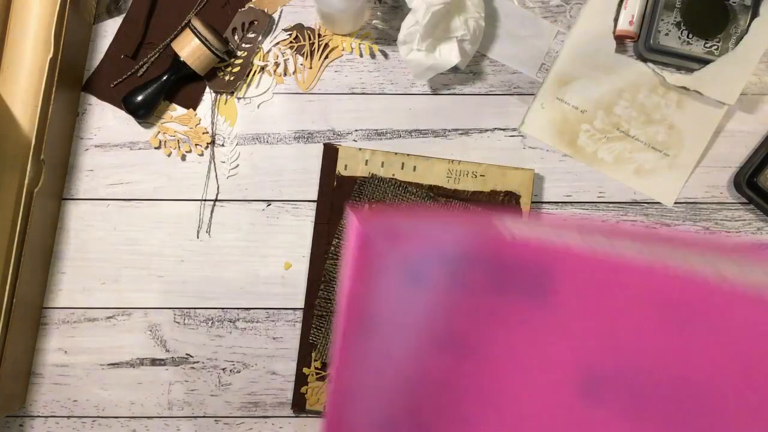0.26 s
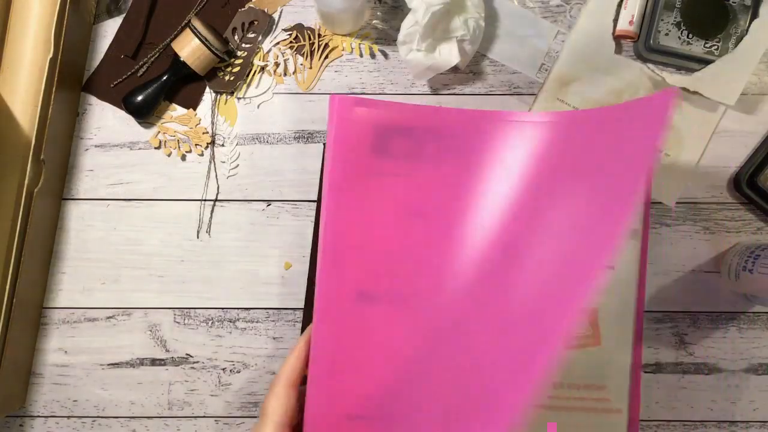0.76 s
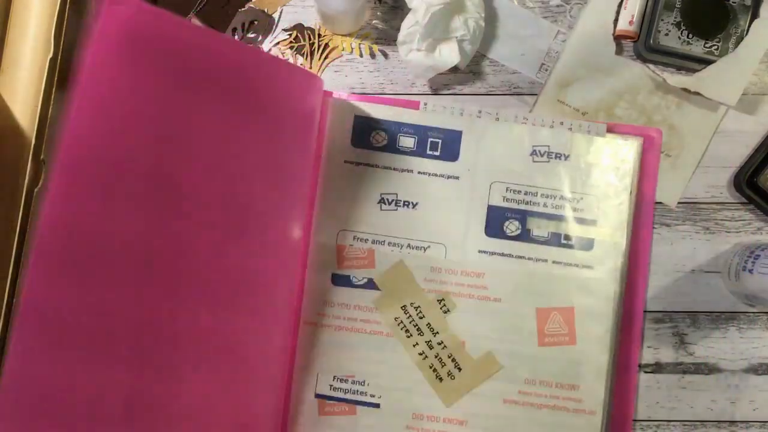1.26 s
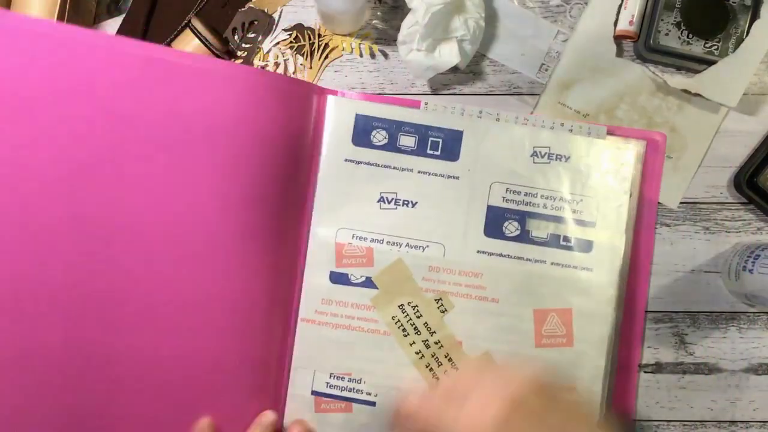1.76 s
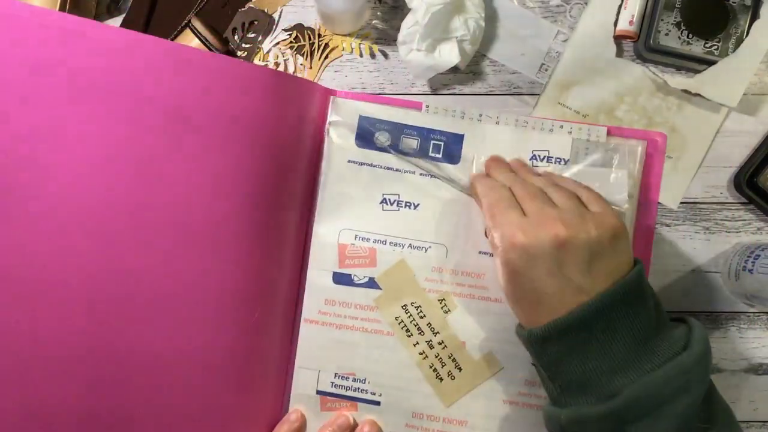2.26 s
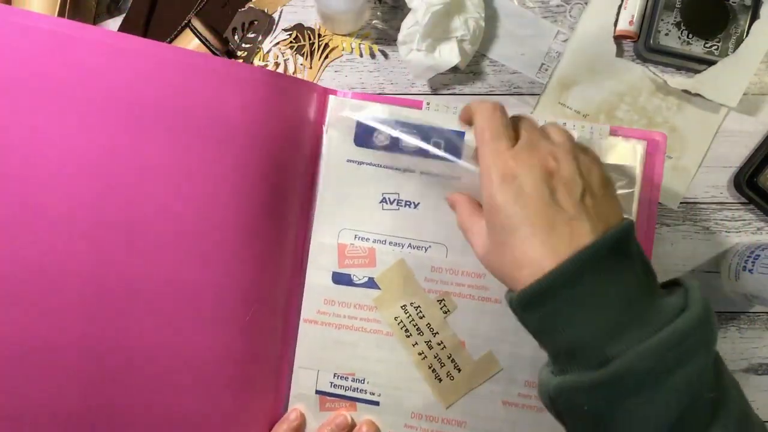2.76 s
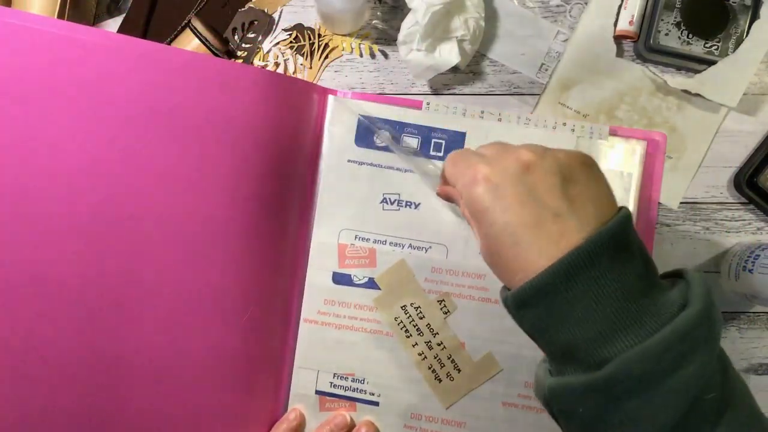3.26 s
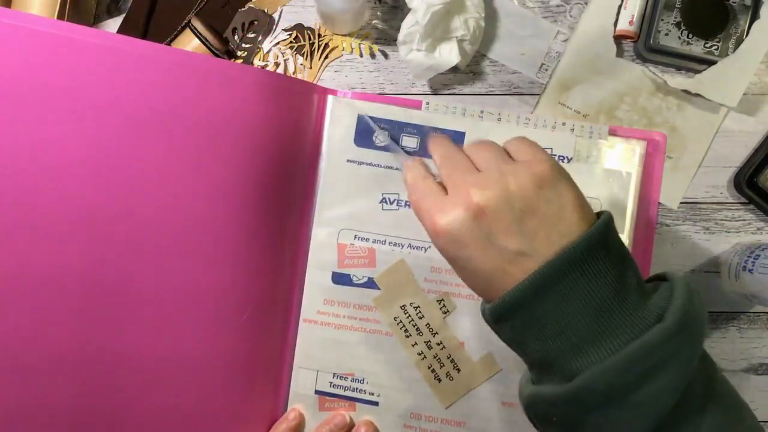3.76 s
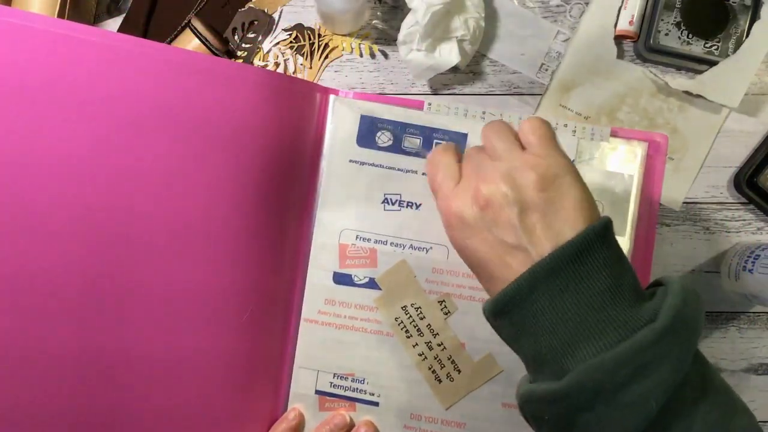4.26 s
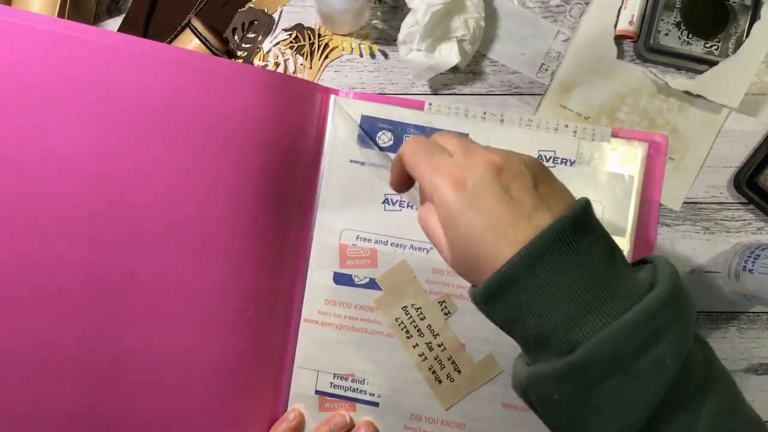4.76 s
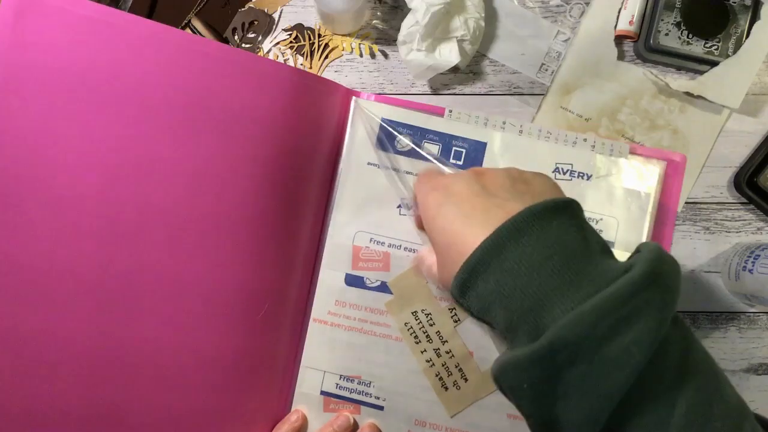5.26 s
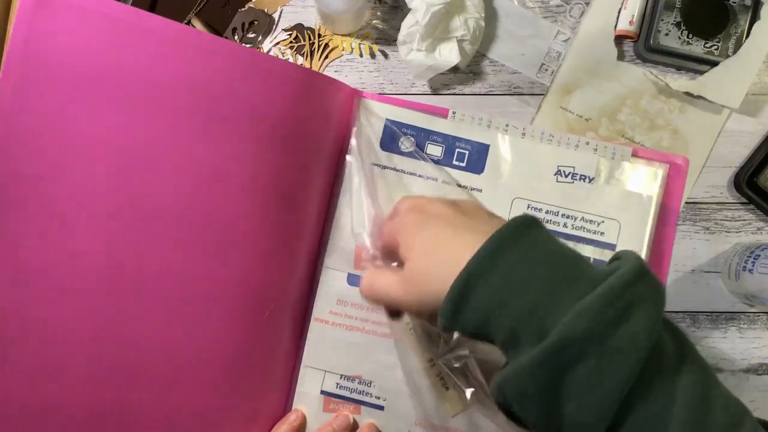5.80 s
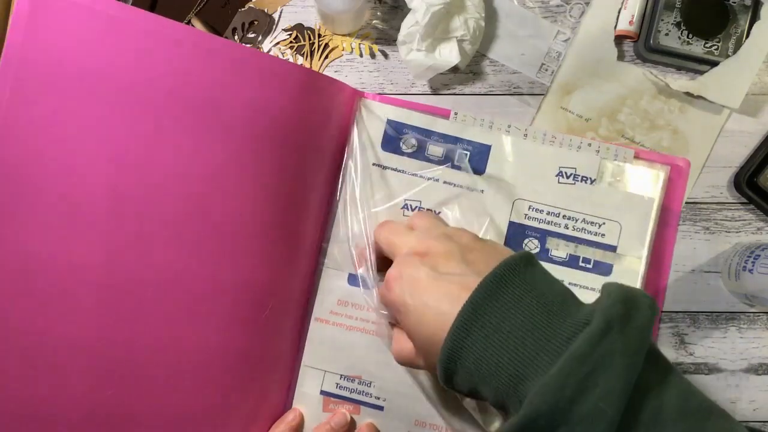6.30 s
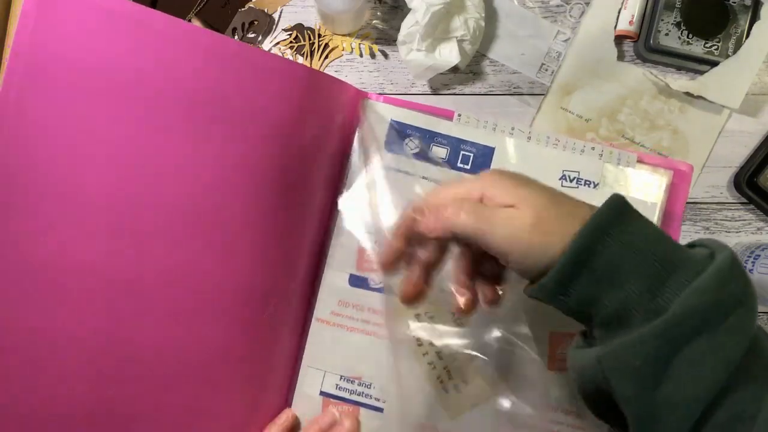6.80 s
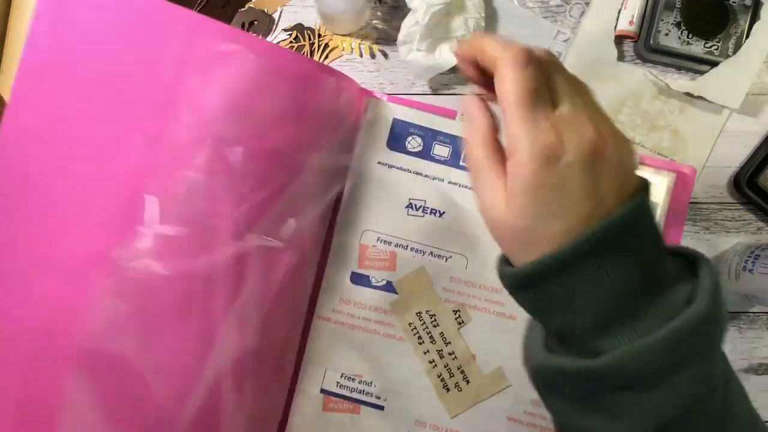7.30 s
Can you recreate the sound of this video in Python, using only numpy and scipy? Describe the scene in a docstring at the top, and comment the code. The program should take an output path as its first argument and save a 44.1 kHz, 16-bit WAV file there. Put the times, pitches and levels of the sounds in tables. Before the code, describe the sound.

Dull desk bumps and plastic scrapes give way to crisp, irregular crinkling of clear film, building to a brisk rustling turn in a quiet room.

```python
"""Over soft room tone, a plastic folder is slid onto a wooden desk and opened: scrapes, hiss and flexes
are filtered noise, and knocks ring the wood. Then fingers pick at a thin clear sleeve: creases snap as
short noise cracks with ringing tones, wrinkles crackle as crowds of tiny bursts, film rubs as noise.
Held flat, the film rings the stack of pages; then it is lifted and turned over, the sheet billows, and
a fingertip knocks on the page. One microphone hangs above the desk in a quiet small room."""
import sys
import numpy as np
from scipy import signal
from scipy.fft import rfft, irfft, next_fast_len
from scipy.io import wavfile

SR = 44100
rng = np.random.default_rng(int(sys.argv[2]) if len(sys.argv) > 2 else 0)


def unload_wav(signal):
    """Save mono or channel-first audio to the path in sys.argv[1] as 16-bit WAV at rate SR, clipped to [-1, 1]."""
    wavfile.write(
        sys.argv[1],
        SR,
        np.round(np.clip(np.atleast_2d(signal).T, -1, 1) * 32767).astype(np.int16),
    )


N = 332514
TIME = np.arange(N) / SR
RING = np.arange(4096) / SR  # time inside one short sound, s

# Room tone. Each row: pitch in Hz, relative level in dB per Hz.
AIR = [(25, -30), (64, 4), (145, 5.5), (277, -2), (714, -3.5), (1100, -12.5), (3920, -13.5), (7110, -17.5),
       (14800, -22), (16000, -45)]
AIR_DB = -68.5  # average level of the room tone
# The cover is pushed over the desk and swung open, then the hand strokes the first page.
# Each row: start in seconds, length in seconds, scrape in dB, hiss in dB (both before trims).
SLIDES = [(0.164, 0.21, -63, -72), (0.482, 0.053, -72.5, -75), (0.568, 0.2, -59, -70.5),
          (0.808, 0.049, -69, -75), (1.01, 0.072, -59, -62), (1.12, 0.14, -77, -68.5),
          (1.384, 0.14, -66, -69.5), (1.622, 0.053, -64.5, -55), (1.763, 0.21, -63.5, -69),
          (2.06, 0.057, -70, -68), (2.17, 0.17, -67, -64), (2.432, 0.062, -62.5, -60.5)]
# Each slide starts, gathers pace and comes to rest.
# One row: attack in seconds, gathering in dB, release in dB per second.
SLIDE_SHAPE = (0.016, 2.45, 161)
# Colours of the scraping and the hissing. Each row: pitch in Hz, relative level in dB per Hz.
SCRAPE_COLOUR = [(60, 6.5), (140, -2), (300, 0), (750, 1), (1900, -4.5), (3500, -8), (8000, -20.5)]
HISS_COLOUR = [(1000, -17), (4000, 4), (8000, -2.5), (16000, -4)]
# What the cover rings at. Each row: pitch in Hz, width in Hz, level in dB.
COVER = [(877, 100, 2.5), (1550, 240, -4.5), (2070, 110, 6)]
# The stiff cover flexing and tapping, and last a fingertip knocking on the page.
# Each row: time in seconds, level in dB before a gain, centre in Hz, 60 dB fading time in seconds.
FLEXES = [(0.3755, -58.5, 6450, .012), (0.4175, -54, 520, .012), (0.576, -53.5, 4470, 0.054),
          (0.714, -50, 940, 0.083), (0.743, -50.5, 2300, 0.03), (1.31, -57, 5800, 0.066),
          (6.2578, -44, 650, 0.021)]
# The folder bumping the desk. Each row: time in seconds, level in dB before a gain,
# centre of the blow in Hz, thud in dB, contact clack in dB (both relative to the blow).
KNOCKS = [(0.581, -56, 600, 2, -13), (0.762, -45, 360, -3, -25), (1.117, -50.5, 360, 7, -9),
          (1.313, -51.5, 372, 5, -11), (1.537, -43, 480, -22, -9.5), (1.687, -39, 480, 5, -3),
          (1.721, -46, 650, -13, -18), (1.837, -36, 423, -26, -13), (1.904, -42, 400, -5, -1)]
# The desk with the folder on it.
# Each row: typical pitch in Hz, relative level in dB, 60 dB fading time in seconds.
DESK = [(142, 4.5, 0.17), (220, 0, 0.1), (316, 1, 0.06), (424, 2, 0.04), (506, 2.5, 0.045),
        (620, -0.5, 0.059), (704, 0, 0.05), (850, -1, 0.036), (1470, -8, 0.031)]
# The loudest creases buckling.
# Each row: time in seconds, level in dB before a gain, treble minus middle in dB (partly applied).
SNAPS = [(2.2361, -41, 4), (2.5051, -45.5, -19), (2.589, -44, -10), (2.704, -43, -22), (2.7432, -42, 1),
         (2.7585, -38.5, 2), (2.762, -37, -15), (2.8215, -38.5, -13.5), (2.9487, -50, -24.5),
         (3.148, -48.5, -18), (3.1748, -44.5, -8), (3.1965, -38.5, -5.5), (3.3156, -45, 0),
         (3.4164, -41, -3), (3.5294, -41.5, -19), (3.6, -47, 11), (3.6047, -43, -4), (3.6403, -45, 1),
         (3.677, -39, -19), (4.0203, -38.5, -15.5), (4.035, -43.5, 9), (4.0582, -46, 10), (4.1004, -44, -1),
         (4.2206, -39, -5), (4.3199, -40, -14), (4.4995, -43.5, -21), (4.5593, -46.5, -29),
         (4.6032, -42, -3.5), (4.7117, -39.5, -7), (4.7523, -41.5, -3), (4.7584, -40, -2),
         (4.7813, -32, 11), (4.8779, -40.5, 3), (4.9643, -41, -5), (4.9834, -37.5, -7), (5.2854, -42, 7),
         (5.3125, -35, 21), (5.3216, -34, -23), (5.3798, -38.5, 6), (5.4594, -44, -16), (5.5224, -43, 8),
         (5.526, -40, -3), (5.66, -32, -6), (5.6954, -40.5, -9), (5.828, -42.5, 6), (5.8767, -40, -14),
         (5.9173, -36, -5), (5.973, -40.5, 5), (6.041, -42, -2), (6.0569, -37, 1), (6.0997, -44, 0),
         (6.133, -42.5, -10), (6.1874, -40.5, 6), (6.227, -44, 19), (6.3157, -39, -6), (6.352, -40, -2),
         (6.3603, -38, -10), (6.4485, -40, -1), (6.5113, -39, 7), (6.5777, -38.5, 2), (6.6595, -41.5, 3),
         (6.7487, -38, 5), (6.8788, -35, -1), (6.8875, -45, -4), (6.9051, -32.5, -8), (6.9427, -38.5, -2),
         (6.9553, -38.5, 3), (6.9655, -38, -9), (7.0595, -40, -1.5), (7.193, -33.5, -11), (7.2253, -38, 1),
         (7.2283, -38, 6), (7.2624, -39.5, -10), (7.2751, -40, -8), (7.4209, -36.5, -17.5),
         (7.4607, -37, -2.5)]
# Colours of the snaps and the film. Each row: pitch in Hz, relative level in dB per Hz.
SNAP_COLOUR = [(100, -29.5), (330, -4), (700, -6.5), (1150, -9.5), (2100, -0.5), (2800, -4.5), (4400, 4),
               (6300, 0.5), (9000, 3.5), (12000, -2), (16000, -0.5)]
FILM_COLOUR = [(60, -18.5), (160, -6.5), (330, 5), (700, 5), (1150, 1), (2100, -1), (4500, 0.5), (6300, -4),
               (9000, -5), (12000, -9.5), (16000, -7)]
# The fingers pick at the sleeve, then tug it up and turn it over.
# Each row: start in seconds, length in seconds, level at full bend in dB.
PULLS = [(2.53, 0.019, -53), (2.647, 0.05, -55), (2.726, 0.11, -52.5), (3.007, 0.084, -60),
         (3.291, 0.095, -56), (3.575, 0.049, -51.5), (3.658, 0.068, -53.5), (3.76, 0.16, -57),
         (4.014, 0.037, -50.5), (4.116, 0.091, -58.5), (4.207, 0.18, -51), (4.427, 0.068, -57.5),
         (4.715, 0.12, -51.5), (4.843, .15, -45), (5.068, 0.092, -47.5), (5.27, 0.046, -43.5),
         (5.498, 0.14, -50), (5.631, 0.024, -42), (5.802, 0.22, -51), (6.257, 0.1, -53.5),
         (6.454, 0.16, -47.5), (6.627, 0.1, -49.5), (6.785, 0.062, -46.5), (6.867, .13, -41),
         (7.032, 0.074, -48), (7.162, 0.096, -44.5), (7.32, 0.1, -52.5), (7.439, 0.016, -45.5)]
# Each pull grips, tightens and lets go.
# One row: attack in seconds, tightening in dB, release in dB per second.
PULL_SHAPE = (0.018, 5.5, 186)
# The hand keeps a light hold on the film that firms as the sleeve comes free.
# One row: start in seconds, level in dB at the start, firming in dB per second.
HOLD = (2.6, -63.3, 0.35)
# What the sleeve lying on the stack of pages rings at. Each row: pitch in Hz, width in Hz, level in dB.
STACK = [(363, 92, 9.5), (2090, 170, 6), (4000, 240, 2)]


def undb(db):
    """Turn decibels into a gain."""
    return np.exp(np.asarray(db) * np.log(10) / 20)


def unit(x):
    """Scale to an average (rms) level of 1."""
    return x / np.sqrt(np.mean(x ** 2))


def unit_energy(x):
    """Scale a short sound so that its squares add up to 1."""
    return x / np.sqrt(np.sum(x ** 2))


def add(track, s, sound):
    """Mix a sound into a track at time s."""
    i = max(int(s * SR), 0)
    track[i:i + len(sound)] += sound[:max(N - i, 0)]


def fade(t, t60):
    """Die away exponentially, 60 dB down after t60 seconds."""
    return np.exp(-np.log(1000) * t / t60)


def walk(rate):
    """Wander along straight lines between random points, rate points per second."""
    points = rng.standard_normal(N)
    return np.interp(TIME * rate, np.arange(N), points)


def padded_size(x):
    """Even, fast transform size with room for a short filter tail."""
    return next_fast_len((len(x) + len(RING)) // 2, True) * 2


def colour(x, points):
    """Filter to a spectrum of (Hz, dB) points without echoing early; white noise keeps its power."""
    hz, db = np.transpose(points)
    size = padded_size(x)
    log_hz = np.log(np.fft.rfftfreq(size, 1 / SR) + 1)
    gain = unit(undb(np.interp(log_hz, np.log(hz), db)))
    # folding the cepstrum makes the filter respond only after its input
    cepstrum = irfft(np.log(gain))
    cepstrum[1:size // 2] *= 2
    cepstrum[size // 2 + 1:] = 0
    return irfft(rfft(x, size) * np.exp(rfft(cepstrum)))[:len(x)]


def disperse(x, lag_s, knee_hz):
    """Bending waves run slower at low pitch, so the lows of a click come late."""
    size = padded_size(x)
    hz = np.fft.rfftfreq(size, 1 / SR)
    phase = 2 * np.pi * lag_s * knee_hz * np.log(1 + hz / knee_hz)
    return irfft(rfft(x, size) * np.exp(-1j * phase))[:len(x)]


def resonate(x, modes):
    """Broad resonances side by side, each a peak filter."""
    return sum(undb(db) * signal.lfilter(*signal.iirpeak(hz, hz / width, fs=SR), x)
               for hz, width, db in modes)


def stroke(start, length, shape):
    """Loudness of one hand movement: a quick start, a steady build to full force, a release."""
    attack_s, build_db, release_db_per_s = shape
    grip = np.clip((TIME - start) / attack_s + .5, 0, 1)
    to_go = np.clip(1 - (TIME - start) / length, 0, 1)
    overtime = np.maximum(TIME - start - length, 0)
    return grip * undb(-build_db * to_go - release_db_per_s * overtime)


def wrinkles(rate, spread_db, t60=0.0098, patchy_db=4.0):
    """A crowd of tiny buckles, each a short burst with its own size and colour; rate per second may move."""
    hit = rng.random(N) < rate / SR
    size_db = spread_db * np.minimum(rng.standard_exponential(N), 2)
    edges = [30, 900, 1800, 3200, 5500, 9000, 17000]  # band edges, Hz
    out = np.zeros(N)
    for band in zip(edges, edges[1:]):
        band_db = size_db + patchy_db * rng.uniform(-1.7, 1.7, N)
        energy = hit * undb(band_db) ** 2 / rate
        # energy is amplitude squared, hence the 2
        lingering = signal.lfilter([1], [1, -fade(2 / SR, t60)], energy + 1e-18)
        burst = np.sqrt(lingering) * rng.standard_normal(N)
        out += signal.sosfilt(signal.butter(1, band, "band", fs=SR, output="sos"), burst)
    return unit(out)


def air():
    """Steady room tone with a soft low rumble, made of coloured noise."""
    return undb(AIR_DB) * unit(colour(rng.standard_normal(N), AIR))


def cover(grit_db=2, scrape_db=-4.5, ring_db=-9):
    """The stiff cover scrapes with a little grit that rings it, and its smooth face hisses."""
    grit = wrinkles(200, spread_db=4.5)
    drag, glide = np.zeros((2, N))
    for s, length, low_db, high_db in SLIDES:
        movement = stroke(s, length, SLIDE_SHAPE)
        drag += undb(low_db) * movement
        glide += undb(high_db) * movement
    scrape = (rng.standard_normal(N) + undb(grit_db) * grit) * undb(scrape_db) * drag
    scrape = colour(scrape, SCRAPE_COLOUR)
    flutter = undb(-0.4 + 3.7 * walk(59))
    hiss = (rng.standard_normal(N) + .5 * grit) * flutter * glide
    return scrape + undb(ring_db) * resonate(scrape, COVER) + colour(hiss, HISS_COLOUR)


def flexes(gain_db=26, width_octaves=0.84, dry_db=-8, spill_db=-22):
    """Cover flexes, taps and the fingertip knock: short noise rattles, with the cover's ring, around one pitch."""
    out, t = np.zeros(N), np.arange(SR // 4) / SR
    hz = np.geomspace(100, 16000, 24)
    for s, db, centre_hz, t60 in FLEXES:
        rattle = rng.standard_normal(len(t)) * fade(t, t60)
        octaves_off = np.log2(hz / centre_hz)
        hump = np.exp(-.5 * (octaves_off / width_octaves) ** 2) + undb(spill_db)
        ringing = resonate(rattle, COVER) + undb(dry_db) * rattle
        flex = colour(ringing, np.transpose([hz, 20 * np.log10(hump)]))
        add(out, s, undb(db + gain_db) * unit_energy(flex))
    return out


def knocks(gain_db=6, width_octaves=1.0, rattle_db=-15, rattle_t60=0.09,
           thud_hz=112, thud_t60=0.066, clack_t60=0.02):
    """Each bump rings the desk around its own pitch, over a low thud; the loose pages rattle with it."""
    out, t = np.zeros(N), np.arange(SR // 2) / SR
    hz, mode_db, t60 = np.array(DESK).T[:, :, None]
    for s, db, centre_hz, thud_db, clack_db in KNOCKS:
        # each spot on the desk favours other modes
        nearness = np.exp(-.5 * (np.log2(hz / centre_hz) / width_octaves) ** 2)
        weight = undb(mode_db) * nearness * rng.choice([-1, 1], hz.shape)
        pitch = hz * (1 + 0.037 * rng.standard_normal(hz.shape))
        modes = weight * np.sin(2 * np.pi * pitch * t) * fade(t, t60)
        ring = modes.sum(axis=0) / np.sqrt(np.sum(weight ** 2))
        pages, contact = rng.standard_normal((2, len(t)))
        rattle_colour = [(40, -16), (centre_hz / 4, -2), (centre_hz * 0.55, 0),
                         (centre_hz * 3, -17), (16000, -50)]
        rattle = colour(pages * fade(t, rattle_t60), rattle_colour)
        thud = .5 * np.sin(2 * np.pi * thud_hz * t) * fade(t, thud_t60)
        body = ring + undb(rattle_db) * rattle + undb(thud_db) * thud
        body = disperse(body, lag_s=0.02394, knee_hz=55.2)
        clack_colour = [(400, -4), (1600, 3.5), (2200, -6.5), (3000, -10), (16000, -30)]
        clack = colour(contact * fade(t, clack_t60), clack_colour)
        add(out, s, undb(db + gain_db) * (body + undb(clack_db) * clack))
    return out


def buckle(crack_t60=0.0044, shiver_db=-12, facet_db=-16, panel_hz=4500, panel_octaves=0.11,
           panel_db=-10, panel_spread_db=3, panel_t60=0.0065):
    """One crease flips: a stuttering crack, its ringing facet, a taut panel whose pitch varies snap to snap."""
    crack, shiver = rng.standard_normal((2, len(RING)))
    tension, coupling, looseness = rng.standard_normal(3)
    # the crack is noise with a second, weaker burst 20 to 129 samples later
    stutter = np.roll(fade(RING, crack_t60), rng.integers(20, 130)) * rng.random() ** 2
    crack = crack * (fade(RING, crack_t60 * 2 ** (looseness / 2)) + stutter)
    shiver = shiver * fade(RING, .02)
    facet_hz = 1600 * 1.65 ** (np.arange(4) + rng.random(4))[:, None]
    facet_modes = rng.standard_normal((4, 1)) * np.sin(2 * np.pi * facet_hz * RING)
    facet = facet_modes.sum(axis=0) * fade(RING, .008)
    taut_hz = panel_hz * 2 ** (panel_octaves * tension)
    panel = np.sin(2 * np.pi * taut_hz * RING) * fade(RING, panel_t60)
    snap = crack + undb(shiver_db) * shiver + undb(facet_db) * facet
    snap = snap + undb(panel_db + panel_spread_db * coupling) * panel
    snap[0] = 2 * rng.choice([-1, 1])  # sharp first click, up or down
    return unit_energy(snap)


def snaps(gain_db=25, tilt_share=0.33, even_db=1, big_db=-37.5, lead_s=0.0052, lead_db=-7):
    """Each crease snaps with its own listed brightness, and loud ones give way in two steps."""
    out = np.zeros(N)
    for s, db, bright_db in SNAPS:
        tilt = tilt_share * (bright_db - even_db)
        # each step: how early in seconds, level in dB
        steps = [(0, 0), (lead_s, lead_db)] if db > big_db else [(0.00012, 0)]
        for early_s, step_db in steps:
            snap = colour(buckle(), [(1500, -tilt), (9000, tilt)])
            add(out, s - early_s, undb(db + gain_db + step_db) * snap)
    return colour(out, SNAP_COLOUR)


def bend():
    """How hard the sleeve is bent: the strongest pull of the moment, or the light hold if that is stronger."""
    hold_s, hold_db, firming = HOLD
    hold = undb(hold_db + firming * (TIME - hold_s)) * (TIME > hold_s)
    pulls = [undb(db) * stroke(s, length, PULL_SHAPE) for s, length, db in PULLS]
    return np.max([hold] + pulls, axis=0)


def sleeve(effort, crackle_db=2, crisp_db=1.95, rub_db=-5.5, stack_db=0.5, billow_db=-20,
           press_s=2.8, settle_s=0.89, lift_s=4.6):
    """Harder bending flips more wrinkles and louder ones; film rubs on film with an uneven grip."""
    rate = np.maximum(200 * (effort / undb(-52)) ** .55, 90)  # wrinkles per second
    crackle = wrinkles(rate, spread_db=7.2)
    rub = undb(rub_db + 4 * walk(150)) * rng.standard_normal(N)
    crisp = colour(crackle, [(900, -crisp_db), (3000, crisp_db)])
    film = colour((undb(crackle_db) * crisp + rub) * effort, FILM_COLOUR)
    # pressed flat, the film sets the pages ringing; lifted clear, the whole sheet billows
    lifted = np.clip((TIME - lift_s) / 0.32 + .5, 0, 1)
    weight = np.clip((TIME - press_s) / settle_s, 0, 1) * (1 - lifted)
    press = (.5 * crackle + rng.standard_normal(N)) * effort * weight
    pressed = undb(stack_db) * resonate(press, STACK)
    billow_colour = [(40, -17), (140, -6), (300, -18), (3000, -73)]
    billow = colour(rng.standard_normal(N) * effort * lifted, billow_colour)
    return film + pressed + undb(billow_db) * billow


def room(x, wet_db=-13, t60=0.37):
    """A small furnished room returns a short, duller tail of fading noise."""
    t = np.arange(SR // 2) / SR
    tail = rng.standard_normal(len(t)) * fade(t, t60) * np.clip(t / 0.0011, 0, 1)
    tail = colour(tail, [(200, 6.5), (4000, -1.0), (16000, 1.0)])
    return x + undb(wet_db) * signal.oaconvolve(x, unit_energy(tail))[:N]


def scene():
    """Folder and sleeve on the desk, heard in the room."""
    folder = cover() + flexes() + knocks()
    film = disperse(snaps() + sleeve(bend()), lag_s=0.01218, knee_hz=118.3)
    return (room(folder + film) + air())[None]


def record(dry):
    """The recorder thins the deep bass below 56 Hz and cuts the top above 15950 Hz."""
    thin = signal.sosfilt(signal.butter(4, 56, "high", fs=SR, output="sos"), dry)
    return signal.sosfilt(signal.ellip(10, .2, 70, 15950, fs=SR, output="sos"), thin)


dry = scene()
out = record(dry)
unload_wav(out)
```